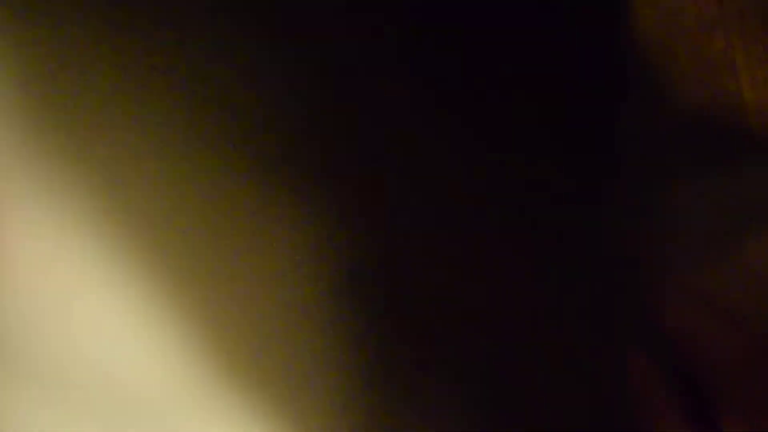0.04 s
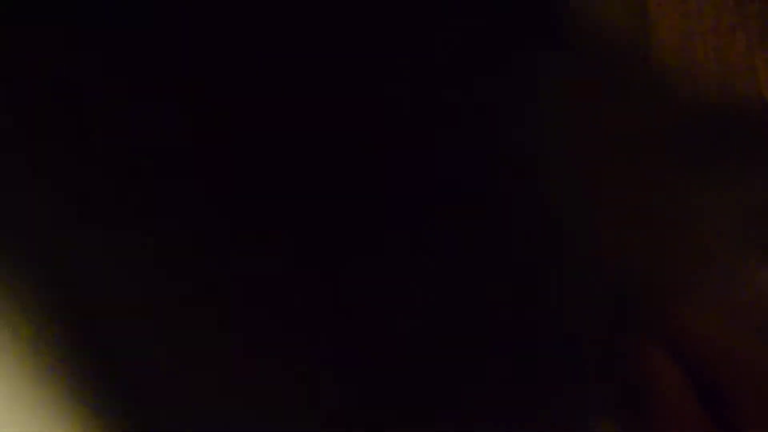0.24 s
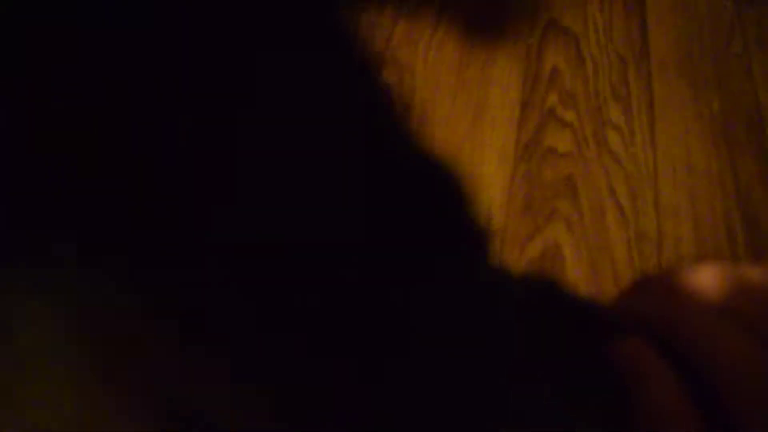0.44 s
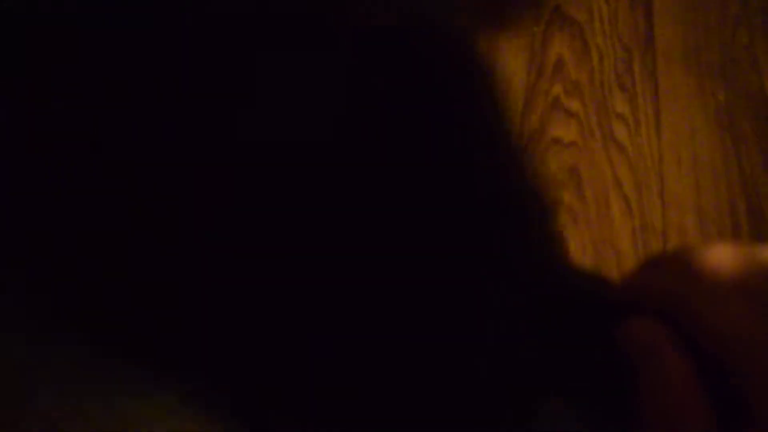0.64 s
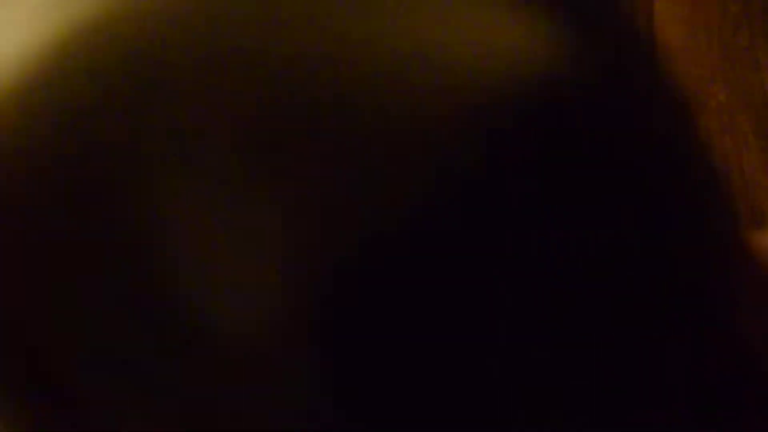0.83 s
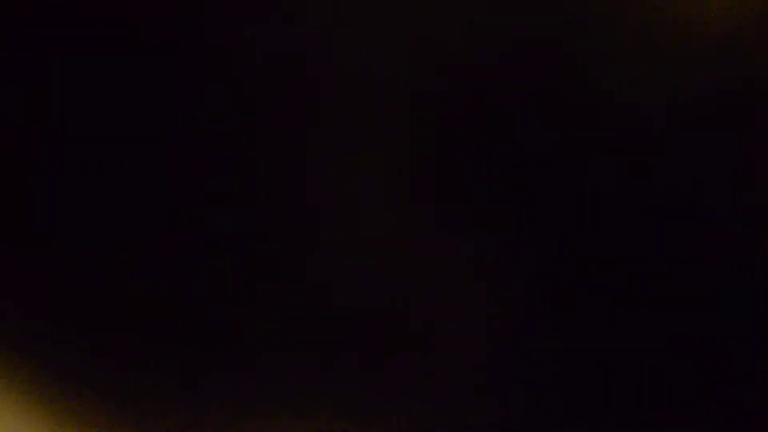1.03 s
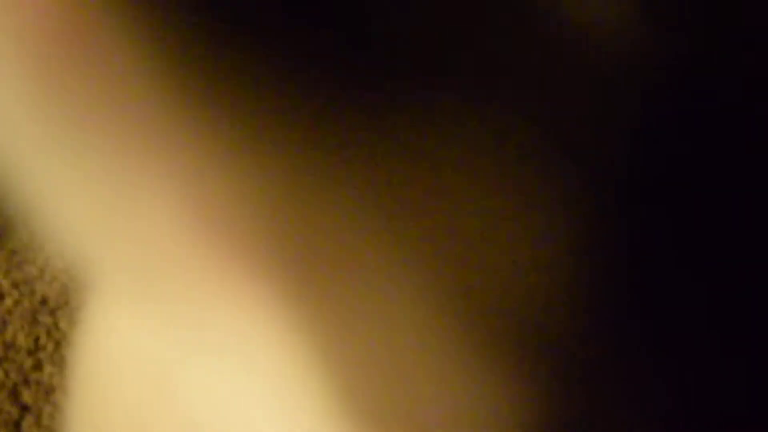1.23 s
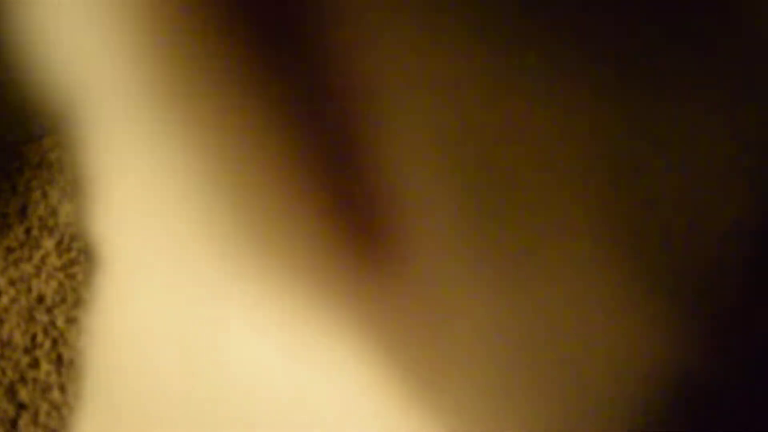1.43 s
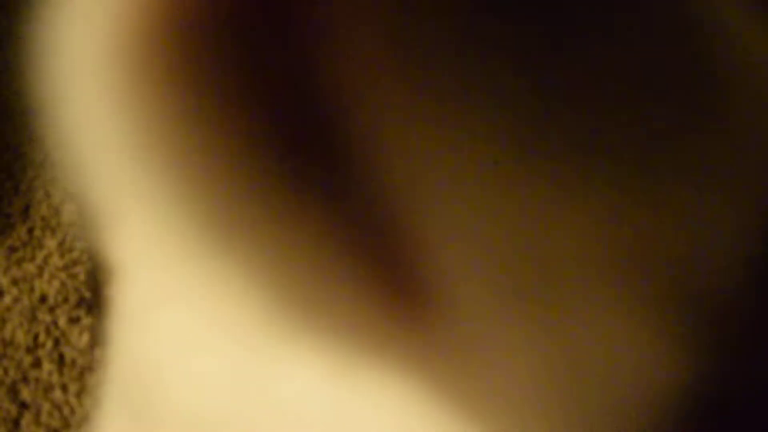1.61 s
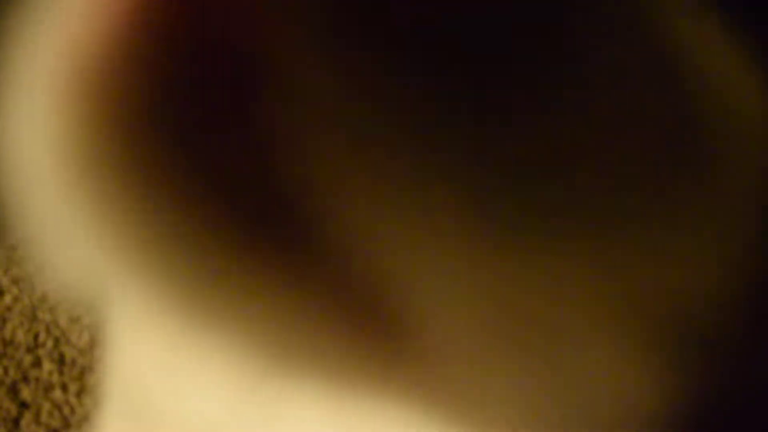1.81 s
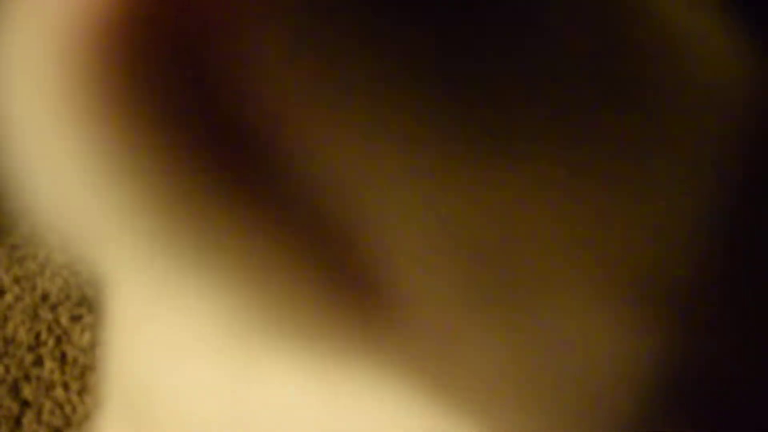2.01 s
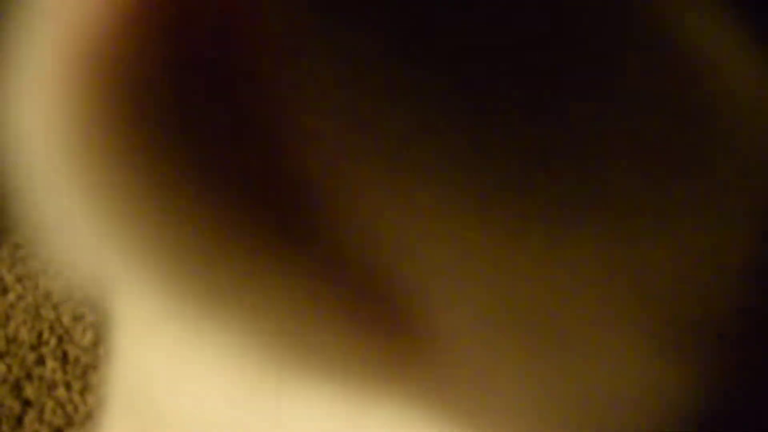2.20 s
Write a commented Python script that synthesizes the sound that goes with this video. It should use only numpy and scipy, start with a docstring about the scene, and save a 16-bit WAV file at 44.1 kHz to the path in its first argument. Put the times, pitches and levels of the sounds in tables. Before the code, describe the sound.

One brief, pulsing cat trill in a quiet room, then a faint purr and soft rustles.

```python
"""In a small, quiet room, a cat gives one rolling trill close to a hand-held camera.
Its vocal folds buzz, and its throat and mouth shape the tone. About 25 times a second the throat
catches: the pitch drops, the voice turns brighter and rougher, then recovers.
Afterwards it purrs faintly; fur brushes and squeaks, and the camera ticks and bumps in the hand."""
import sys
import numpy as np
from scipy import signal
from scipy.fft import rfft, irfft
from scipy.io import wavfile

SR = 44100
rng = np.random.default_rng(int(sys.argv[2]) if len(sys.argv) > 2 else 0)


def dump_mix(stems):
    """Bounce the given channels to the path in sys.argv[1] as a 16-bit WAV at rate SR."""
    frames = np.atleast_2d(stems).T  # one column per channel
    limited = np.clip(frames, -1, 1)  # hard clip at full scale
    pcm = np.round(limited * 32767).astype(np.int16)
    wavfile.write(sys.argv[1], SR, pcm)


N = 103635
T = np.arange(N) / SR
HZ = np.fft.rfftfreq(N, 1 / SR)


def amp(db):
    """Turns decibels into a gain."""
    return 10 ** (np.asarray(db) / 20)


def curve(points):
    """Joins (time_s, value) points with straight lines."""
    return np.interp(T, *np.transpose(points))


def colour(points, hz, column=1):
    """Reads a table of levels at any pitch, blending between rows."""
    table = np.array(points)
    return np.interp(np.log(hz + 1), np.log(table[:, 0] + 1), table[:, column])


def noise(gains):
    """Noise shaped by a gain at each frequency, then scaled to a level of 1."""
    shaped = irfft(rfft(rng.standard_normal(N)) * gains, N)
    return shaped / np.sqrt(np.mean(shaped ** 2) + 1e-20)


def wobble(hz):
    """Random drift, up to about hz times a second."""
    return noise(1 / (1 + (HZ / hz) ** 4))


def bell(s, half_s):
    """A smooth swell around a moment."""
    return np.exp(-.5 * np.minimum(((T - s) / half_s) ** 2, 200))


def held(s, length_s, rise_s, fall_s):
    """Rises to 1, holds, and falls."""
    ramp = .5 + np.minimum((T - s) / rise_s, (s + length_s - T) / fall_s)
    return np.sin(np.pi / 2 * np.clip(ramp, 0, 1)) ** 2


def low_cut(x, hz):
    """Turns down the bass below hz."""
    return signal.sosfilt(signal.butter(2, hz, "high", fs=SR, output="sos"), x)


def taps(events, tones, low_hz, high_hz, tilt_db=0):
    """Each tap rings tones that fade 60 dB in their ring_s, trimmed to low_hz..high_hz."""
    t = T[:SR // 8]
    ring = np.zeros(len(t))
    for hz, db, ring_s in tones:
        octaves_up = np.log2(hz / tones[0][0])
        ring += amp(db + tilt_db * octaves_up - 60 * t / ring_s) * np.sin(2 * np.pi * hz * t)
    ring = signal.sosfilt(signal.butter(3, high_hz, fs=SR, output="sos"), low_cut(ring, low_hz))
    out = np.zeros(N)
    for s, peak_db in events:
        part = out[round(s * SR):][:len(ring)]
        part += amp(peak_db) * ring[:len(part)] / abs(ring).max()
    return out


# the room's soft rush: pitch_hz, relative_db
ROOM_COLOUR = [(40, -20), (80, -12), (125, -14), (200, -10), (324, -6.5), (606, -4), (787, -3.5),
               (1170, -8), (1600, -12), (2000, -13), (2700, -18.5), (4190, -21.5), (7000, -29.5),
               (11900, -35), (13200, -40), (15500, -45)]
# hums and whines: pitch_hz, width_hz, level_db
ROOM_HUMS = [(208.5, 10.3, -68.5), (406.1, 16.6, -63.5), (1552, 28, -71), (3171, 102, -68.5)]
def room_noise():
    """A steady rush with faint hums, each a narrow band of noise."""
    rush = amp(-54.5 + .2 * wobble(hz=9.4)) * noise(amp(colour(ROOM_COLOUR, HZ)))
    hums = sum(amp(db) * noise(1 / (1 + (2 * (HZ - hz) / width) ** 2)) for hz, width, db in ROOM_HUMS)
    return rush + hums


# how loud the fur hisses: time_s, level_db
FUR_LEVEL = [(.14, -57), (.24, -55.5), (.36, -58), (.45, -70), (.9, -100)]
# its tone: pitch_hz, relative_db
FUR_COLOUR = [(100, -1.5), (700, 7.5), (2000, -6), (5000, -6), (7800, -9), (8800, -13), (9900, -9),
              (10700, -13), (12200, -7), (14000, -22), (15300, -13)]
def fur_hiss():
    """Fur against the camera makes a soft hiss that dies away."""
    return amp(curve(FUR_LEVEL)) * noise(amp(colour(FUR_COLOUR, HZ)))


# the note between catches: time_s, pitch_hz
VOICE_PITCH = [(.15, 568.2), (.19, 591.5), (.205, 587.7), (.222, 625.2), (.268, 660), (.305, 630.6),
               (.345, 627.6), (.361, 645), (.372, 725.3), (.39, 704.3), (.415, 703), (.45, 695.4),
               (.47, 705.3), (.503, 709), (.533, 664.6), (.546, 667.5), (.572, 644), (.586, 660),
               (.609, 595.5), (.64, 539)]
# how hard the cat calls: time_s, level_db
VOICE_EFFORT = [(.184, -76), (.19, -29), (.203, -35), (.225, -24), (.262, -24), (.29, -23.5), (.345, -26.5),
                (.375, -22), (.41, -25.5), (.455, -27), (.50, -26.5), (.56, -29), (.586, -27.5),
                (.598, -30), (.616, -32.5), (.628, -40)]
# blips of voice before and after: time_s, level_db, half_length_s
VOICE_BLIPS = [(.156, -34.5, .0029), (.633, -35, .002)]
# the mouth: time_s, opening (-1 pressed shut, 0 shut, 1 open)
MOUTH_OPENING = [(.19, -0.37), (.215, -0.22), (.235, -0.023), (.268, -0.092), (.277, 0.66), (.305, 0.93),
                 (.358, 0.91), (.38, 0.35), (.43, 0.39), (.5, 0.2), (.6, 0.27)]
def trill():
    """The vocal folds buzz as breath passes; pitch and level shake more in each catch."""
    drop, bright, rough = throat_catches()
    mouth = curve(MOUTH_OPENING)
    pitch_shake = 1 + (.0042 + .017 * rough) * wobble(hz=320)
    hz = curve(VOICE_PITCH) * (1 - drop) * pitch_shake
    phase = 2 * np.pi * np.cumsum(hz) / SR
    level = amp(curve(VOICE_EFFORT)) * (T > VOICE_EFFORT[0][0]) * (T < VOICE_EFFORT[-1][0])
    level += sum(amp(db) * bell(s, half_s) for s, db, half_s in VOICE_BLIPS)
    level_shake = 1 + (.03 + .11 * rough) * wobble(hz=355)
    buzz = vocal_folds(hz, phase, mouth, bright) * level_shake
    return level * (buzz + breath(phase, mouth, rough))


# how the throat shapes the voice: pitch_hz, mouth_shut_db, added_when_open_db, added_in_catch_db
THROAT_COLOUR = [(486, -4.5, -5, -7), (603, -3.5, -4, -5), (716, 0.5, 0.5, -4.5), (1060, -8.5, -6, 6),
                 (1233, -10.5, 15, 7), (1400, -10, 16, 19.5), (1575, -24, 27, 6.5), (2130, -29, 21, 14.5),
                 (2435, -26.5, 23.5, 2), (2890, -36, 13, -10.5), (3270, -31.5, 7, 10),
                 (4150, -45.5, 20.5, 3.5), (4720, -39, 31.5, 8.5), (5250, -41.5, 14.5, 8),
                 (5520, -39, 21.5, 2.5), (6760, -61, 22.5, 7.5), (10250, -49, 6.5, 9), (11100, -60, 9, 0),
                 (12800, -67, 3, -9)]
# the folds beat strong-weak, adding tones between the overtones: time_s, half_length_s, relative_db
UNEVEN_BEATS = [(0.206, 0.012, -11.5), (0.328, 0.011, -15)]
def vocal_folds(hz, phase, mouth, bright):
    """A note and its overtones, shaped by a throat whose upper resonances sink during the call."""
    sink_per_s, middle_s, full_sink_hz = .28, .37, 2300
    throat_size = np.exp(sink_per_s * (T - middle_s))
    uneven = sum(amp(db) * bell(s, half_s) for s, half_s, db in UNEVEN_BEATS)
    buzz = np.zeros(N)
    for multiple in np.arange(1, 22, .5):
        tone_hz = multiple * hz
        table_hz = tone_hz * throat_size ** np.minimum(tone_hz / full_sink_hz, 1)
        shut_db, open_db, catch_db = (colour(THROAT_COLOUR, table_hz, column) for column in (1, 2, 3))
        gain = amp(shut_db + mouth * open_db + bright * catch_db) * (uneven if multiple % 1 else 1)
        buzz -= np.sqrt(2) * gain * np.cos(multiple * phase)
    return buzz


# air passing with the voice: pitch_hz, relative_db
BREATH_COLOUR = [(200, -35), (600, -35), (1300, 7), (2400, 1), (3400, -2), (4600, 1), (7000, -20),
                 (10000, -21), (15000, -36)]
def breath(phase, mouth, rough):
    """Air puffs with each beat of the folds, louder with an open mouth or in a catch."""
    puffs = 1 + .5 * np.cos(phase)
    return noise(amp(colour(BREATH_COLOUR, HZ))) * puffs * amp(-32 + 5 * mouth + 11 * rough)


# pops in the voice: start_s, peak_db
FOLD_POPS = [(.187, -34), (.275, -26), (.430, -28), (.550, -27), (.589, -33), (.631, -28.5), (.639, -38)]
# the throat's ring: pitch_hz, relative_db, ring_s
THROAT_TONES = [(628, -9, 0.013), (1024, 13, 0.016), (1650, 2, 0.016), (4700, -49, 0.0096)]
def fold_pops():
    """The folds snap open and make the throat ring."""
    return taps(FOLD_POPS, THROAT_TONES, low_hz=474, high_hz=3420)


# catches: start_s, length_s, share_of_pitch_lost, brightening (0-1), roughness (0-1)
THROAT_CATCHES = [(.229, .009, 0.15, 0.82, 0.03), (0.274, 0.027, 0.13, 0.18, 0.42),
                  (0.32, 0.023, 0.071, 0.1, 0.53), (0.391, .014, .16, 0.85, .45),
                  (.429, 0.015, .15, 0.64, 0.88), (0.473, 0.019, 0.15, 0.88, 0.28),
                  (0.51, 0.014, 0.17, 1, 0.1), (0.55, 0.017, .26, 1, 0.3), (0.59, 0.013, 0.25, 1, 0.48),
                  (0.61, 0.015, 0.21, 0.28, 0.77)]
def throat_catches():
    """The pitch snaps down, creeps up and jumps back; meanwhile the voice is brighter and rougher."""
    drop, bright, rough = np.zeros((3, N))
    for s, length_s, share, brightening, roughness in THROAT_CATCHES:
        creep = 1 - .45 * np.clip((T - s) / length_s, 0, 1) ** 2
        drop += share * creep * held(s, length_s, rise_s=.0045, fall_s=.01)
        bright += brightening * held(s, length_s, rise_s=.012, fall_s=.012)
        rough += roughness * held(s, length_s, rise_s=.0047, fall_s=.0047)
    return drop, bright, rough


# strokes of fur: time_s, half_length_s, level_db, pitch_hz, width_octaves
FUR_STROKES = [(0.235, 0.027, -57, 8100, 0.46), (0.655, 0.013, -63, 5650, 0.69),
               (0.875, 0.017, -54.5, 850, 0.7), (0.879, 0.016, -63.5, 7360, 0.62),
               (1.2333, 0.003, -42.5, 3330, 0.25), (1.234, 0.0056, -57, 7600, 0.32),
               (1.265, 0.0066, -53, 3960, 0.58), (1.276, 0.041, -55.5, 1600, 0.66),
               (1.462, 0.018, -70.5, 11400, 0.17), (1.536, 0.021, -52.5, 1570, 0.26),
               (1.826, 0.012, -51.5, 1470, 0.47), (2.159, 0.0063, -55.5, 3600, 0.52),
               (2.251, 0.03, -51.5, 684, 1.45)]
def fur_brushes():
    """Each brush of fur is a short swell of noise around one pitch."""
    out = np.zeros(N)
    for s, half_s, db, hz, octaves in FUR_STROKES:
        band = np.exp(-.5 * (np.log2((HZ + 1) / hz) / octaves) ** 2)
        out += amp(db) * bell(s, half_s) * noise(band)
    return out


# beats of the purr: start_s, peak_db
PURR_BEATS = [(.817, -44), (0.855, -39), (.893, -41.5), (0.937, -41), (1.012, -41), (1.051, -41),
              (1.213, -41.5), (1.243, -41.5), (1.387, -39.5), (1.428, -44), (1.465, -41), (1.501, -48.5),
              (1.542, -44.5), (1.579, -44.5), (1.62, -48), (1.66, -50), (1.732, -47)]
# the ring of chest and throat: pitch_hz, relative_db, ring_s
CHEST_TONES = [(151, -11, 0.23), (262, 11, 0.012), (392, 6, 0.0041)]
def purr():
    """Soft, low beats ring the chest in short runs, about 26 a second."""
    return taps(PURR_BEATS, CHEST_TONES, low_hz=92, high_hz=1500)


# the squeak's sagging note: time_s, pitch_hz
SQUEAK_NOTE = [(1.224, 7560), (1.234, 7320), (1.238, 6800)]
def fur_squeak():
    """Rubbing makes one thin, unsteady squeak with a faint tone an octave above."""
    hz = curve(SQUEAK_NOTE) * (1 + .012 * wobble(hz=950))
    phase = 2 * np.pi * np.cumsum(hz) / SR
    tone = np.sin(phase) + amp(-25) * np.sin(2 * phase)
    return amp(-46.5) * bell(s=1.2305, half_s=.004) * tone


# ticks: start_s, peak_db, treble_tilt_db_per_octave
CAMERA_TICKS = [(1.3675, -37.5, 2.5), (1.425, -41, 1), (1.4466, -31, 3), (1.4635, -35, -2)]
# the camera body's ring: pitch_hz, relative_db, ring_s
CAMERA_TONES = [(784, 4, 0.017), (1070, 7, 0.0083), (1876, 8, 0.014), (5200, -9, 0.0065),
                (7950, -9.5, 0.0035), (11300, -23, 0.012)]
def camera_ticks():
    """The camera's body ticks in the hand, some ticks brighter than others."""
    return sum(taps([(s, db)], CAMERA_TONES, low_hz=347, high_hz=11700, tilt_db=tilt_db)
               for s, db, tilt_db in CAMERA_TICKS)


# bumps: start_s, peak_db
HAND_BUMPS = [(2.2365, -36), (2.2725, -37)]
# their dull ring: pitch_hz, relative_db, ring_s
BUMP_TONES = [(320, -2.5, 0.032), (550, -6.5, 0.013), (1000, -2.5, 0.024), (2940, -4, 0.0077)]
def hand_bumps():
    """The hand knocks softly on the camera twice."""
    return taps(HAND_BUMPS, BUMP_TONES, low_hz=192, high_hz=4450)


# first echoes: delay_s, gain
NEAR_ECHOES = [(.0023, 0.064), (.0041, -0.09), (.0067, .06)]
def room_echo(x, tail_db=-15.5, ring_s=.16):
    """Sound bounces off a few near surfaces, then fades in a short, weak tail."""
    t = T[:SR // 3]
    tail = rng.standard_normal(len(t)) * amp(-60 * t / ring_s) * (t > .006)
    response = amp(tail_db) * tail / np.linalg.norm(tail)
    response[0] = 1  # the direct sound
    for delay_s, gain in NEAR_ECHOES:
        response[round(delay_s * SR)] += gain
    return signal.fftconvolve(x, response)[:N]


def scene():
    """The cat and the handling sounds echo in the room, over its noise and the fur's hiss."""
    cat = trill() + fold_pops() + purr()
    handling = fur_brushes() + fur_squeak() + camera_ticks() + hand_bumps()
    return (room_echo(cat + handling) + room_noise() + fur_hiss())[None]


def record(dry):
    """The microphone loses the deep bass, and the recorder cuts the highest treble."""
    thin = low_cut(dry, hz=115)
    treble_cut = signal.firwin(511, 15730, window=("kaiser", 9), fs=SR)
    return signal.oaconvolve(thin, treble_cut[None], "same")


dry = scene()
out = record(dry)
dump_mix(out)
```